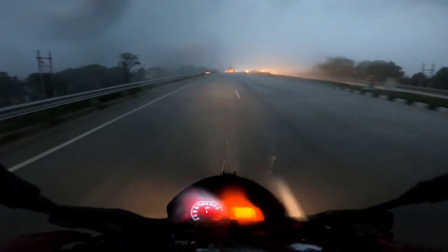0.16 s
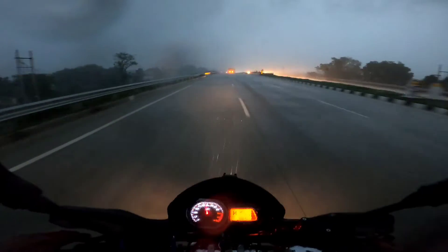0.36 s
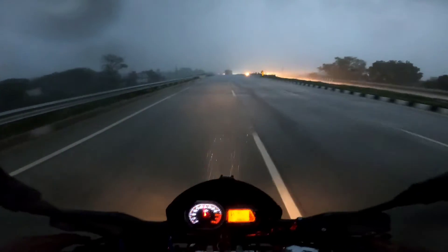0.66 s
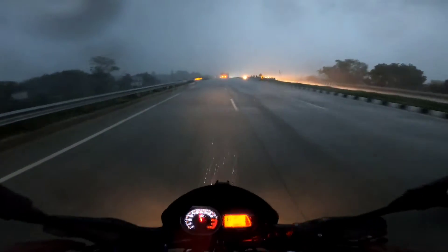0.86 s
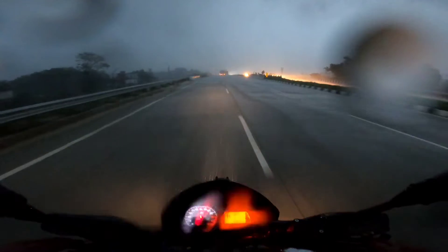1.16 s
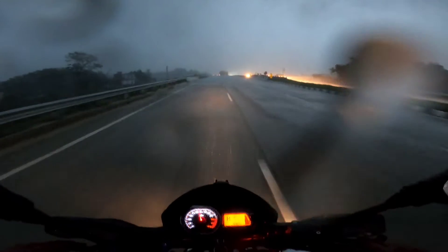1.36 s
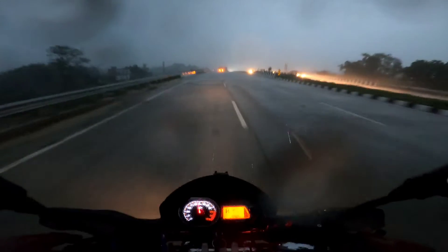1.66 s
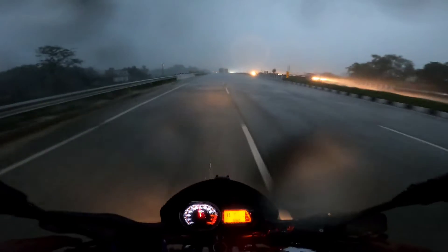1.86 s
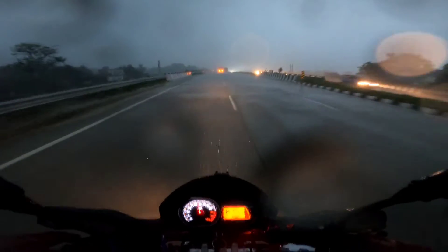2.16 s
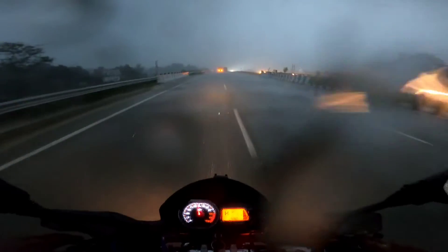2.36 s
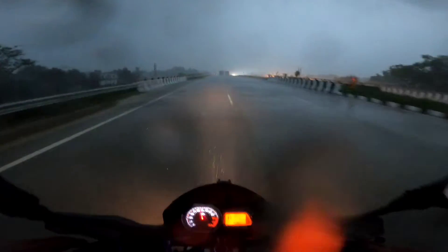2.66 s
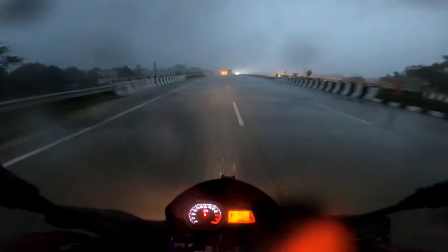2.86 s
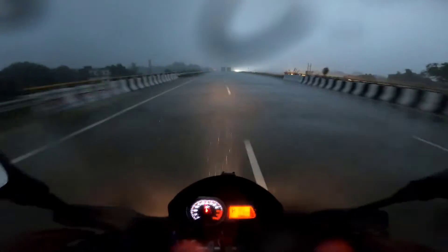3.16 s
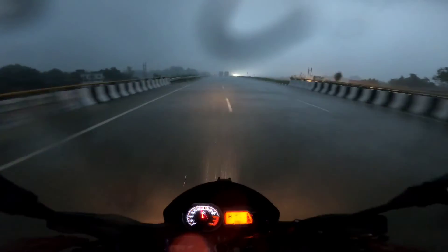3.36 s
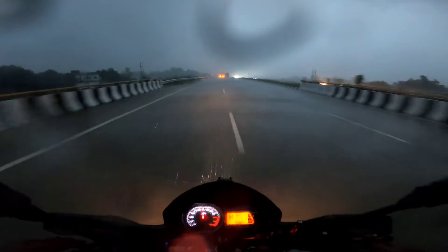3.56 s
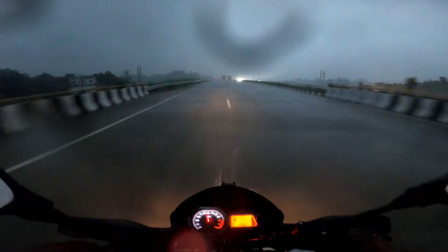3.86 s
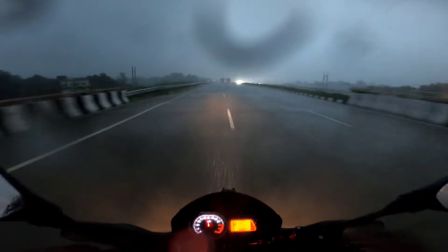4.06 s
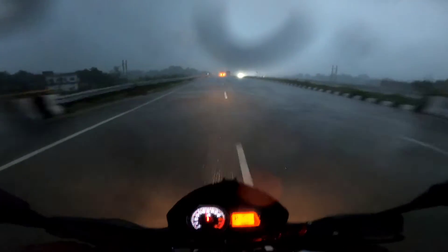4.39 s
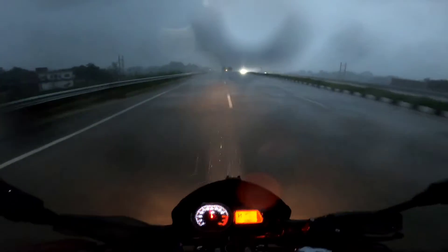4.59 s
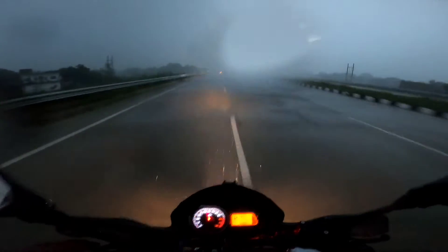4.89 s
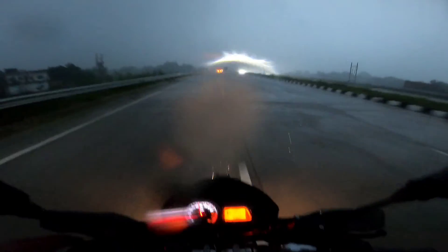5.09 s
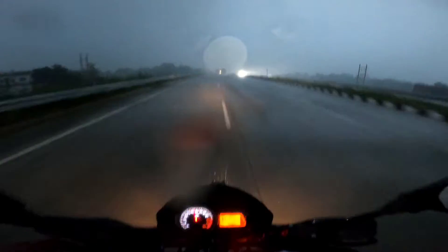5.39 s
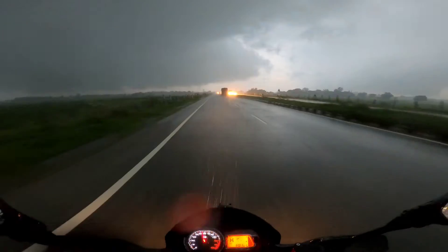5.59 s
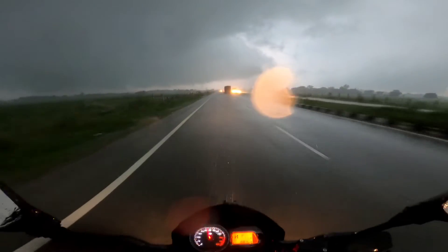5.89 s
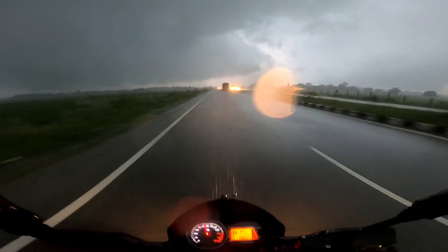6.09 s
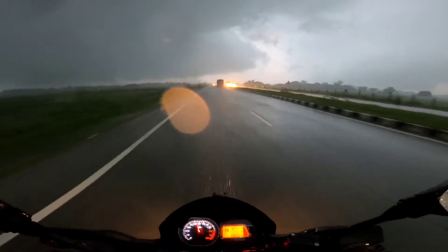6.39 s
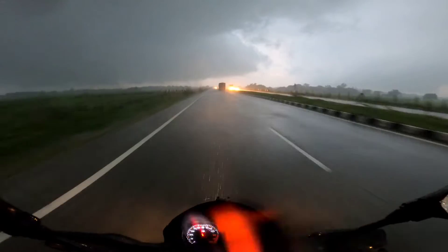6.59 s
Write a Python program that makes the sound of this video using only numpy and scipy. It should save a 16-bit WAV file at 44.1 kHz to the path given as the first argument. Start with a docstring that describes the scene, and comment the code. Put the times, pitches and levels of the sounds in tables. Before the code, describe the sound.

An exposed microphone in a plastic housing rides above a motorcycle handlebar at speed on an open road in heavy rain. Throughout, wind makes a bassy, uneven roar: slow pressure thumps, deep rumble, a hollow mid-low tone and a fluttering rush, dipping and swelling several times a second. From 0 to 1.8 s, dry, sharp raindrop ticks crowd together with spray hiss, short watery slaps and very faint high noise flecks. From 1.9 to 3.9 s drops are sparser and wind dominates, heavy near 2.9 s, with a slap near 3.4 s. Hard snaps strike at about 4.0 and 4.1 s, then a wet splat at 4.9 s and another hard tick just after. At 5.65 s sound cuts abruptly to silence, fading back by 5.95 s. Wind and a fresh cluster of ticks continue to the end, around 6.7 s. No engine is heard.

```python
"""Wind buffets and roars round a plastic housing above the handlebar of a motorcycle ridden fast in heavy rain.
Wind is four bands of noise: slow pressure lumps, a deep roar, a hollow roar and an edge rush; no engine is heard.
Spray is hiss and tiny bursts; drops tick and ring the shell by damped sines; slaps and gobs are shaped noise.
Faint narrow-band noise bursts come early on.
Near 5.65 s the sound drops out for about a quarter of a second, then fades back in.
"""
import sys
import numpy as np
from scipy import signal
from scipy.fft import rfft, irfft, next_fast_len
from scipy.io import wavfile
from scipy.ndimage import uniform_filter1d, map_coordinates

SR = 44100
rng = np.random.default_rng(int(sys.argv[2]) if len(sys.argv) > 2 else 0)


def store_wav(level_fs):
    """Save 16-bit WAV to argv[1]."""
    pcm = np.round(np.clip(np.atleast_2d(level_fs), -1, 1) * 32767)
    wavfile.write(sys.argv[1], SR, pcm.T.astype(np.int16))


N = 297218


def amp(db):
    """Decibels to gain."""
    return 10 ** (np.asarray(db) / 20)


def unit(x):
    """Scale to rms 1."""
    return x / np.sqrt(np.mean(x ** 2) + 1e-20)


def unit_peak(rows):
    """Scale each row to a peak of 1."""
    return rows / (np.abs(rows).max(axis=-1, keepdims=True) + 1e-20)


def columns(rows):
    """Table columns, each shaped to broadcast along time."""
    return np.transpose(rows)[:, :, None]


def curves(rows):
    """One interpolated value per sample for each column after the time."""
    time_s, *cols = np.transpose(rows)
    return [np.interp(np.arange(N) / SR, time_s, col) for col in cols]


def bell(centre_s, half_s):
    """Gaussian bell of peak 1, down to 1/e at half_s from its centre."""
    return np.exp(-((np.arange(N) / SR - centre_s) / half_s) ** 2)


def swells(rows):
    """Sum of bell-shaped level changes in dB."""
    time_s, change_db, half_s = columns(rows)
    return (change_db * bell(time_s, half_s)).sum(0)


def wobble(rate_hz):
    """Smooth random curve with rate_hz knots a second."""
    knots = rng.standard_normal(int(N * rate_hz / SR) + 4)
    return map_coordinates(knots, [np.arange(N) * rate_hz / SR])


def coloured(x, spectrum):
    """Filter x by a gain curve interpolated in dB over log frequency."""
    n = x.shape[-1]
    m = next_fast_len(n + n // 8)
    hz, db = np.transpose(spectrum)
    gain = amp(np.interp(np.log(np.fft.rfftfreq(m, 1 / SR) + 1), np.log(hz), db))
    return irfft(rfft(x, m) * gain, m)[..., :n]


def placed(sounds, starts_s):
    """Sum the rows of sounds, each from its start time."""
    index = np.round(np.abs(starts_s) * SR).astype(int) + np.arange(sounds.shape[1])
    return np.bincount(index.ravel(), sounds.ravel(), N)[:N]


# brief, faint narrow-band noise bursts: (time [s], level [dB], centre [Hz], half length [s])
NOISE_BURSTS = [(.585, -55, 4550, .004), (0.711, -59, 5870, 0.014), (0.786, -51, 4500, .005),
                (0.996, -55, 5500, 0.011), (1.174, -59, 4200, .02), (1.225, -66, 3930, .015)]


def noise_bursts(width_hz):
    """Brief, faint narrow-band noise bursts: a random complex envelope on a carrier, with fast level wobble."""
    t = np.arange(N) / SR
    out = np.zeros(N)
    for time_s, level_db, hz, half_s in NOISE_BURSTS:
        envelope = wobble(width_hz) + 1j * wobble(width_hz)
        band = np.real(envelope * np.exp(2j * np.pi * hz * t))
        noise = unit(band * amp(3 * wobble(200)))
        out += amp(level_db) * bell(time_s, half_s) * noise
    return out


# colour of water thrown flat on the shell: (frequency [Hz], gain [dB])
SLAP_SPECTRUM = [(600, -29.5), (950, 4.5), (1200, 4), (1500, -1), (1900, -10), (2400, -17.5), (3200, -29.5),
                 (5000, -43.5), (9000, -78.5)]
# slaps of water: (time [s], level [dB], half length [s])
WATER_SLAPS = [(.195, -38.5, 0.031), (.368, -33.5, 0.016), (0.613, -39, 0.013), (.675, -36, 0.044),
               (0.79, -36, 0.027), (1.01, -39, .015), (1.235, -35, 0.013), (1.43, -40, 0.019),
               (1.642, -40, 0.024), (3.323, -40, 0.031), (3.395, -31.5, 0.0055), (3.68, -49, 0.026),
               (4.08, -33, 0.0069), (4.406, -37, 0.015), (4.785, -46, 0.016), (6.135, -43, .009),
               (6.21, -39, .015)]


def slaps(eddies):
    """Water thrown flat on the shell: short, low, churning rushes of noise."""
    time_s, level_db, half_s = columns(WATER_SLAPS)
    level = (amp(level_db) * bell(time_s, half_s)).sum(0)
    churn = coloured(rng.standard_normal(N), SLAP_SPECTRUM) * amp(4.4 * eddies)
    return level * unit(churn)


# modes of the housing: (frequency [Hz], relative level [dB], share of the ring time [ratio])
SHELL_MODES = [(2170, -10, 0.7), (2660, -6, 0.95), (2940, -18, 0.6), (3200, -10, 0.55), (3850, -14, 0.55)]


def shell_ring(t, ring_t60_s, mode_gains):
    """Decaying sines at the shell modes, with one row of mode gains per hit."""
    ring = 0
    for k, (mode_hz, level_db, share) in enumerate(SHELL_MODES):
        decay = amp(level_db - 60 * t / (share * ring_t60_s))
        ring = ring + mode_gains[:, [k]] * decay * np.sin(2 * np.pi * mode_hz * t)
    return ring


# colour of a gob on the wet shell: (frequency [Hz], gain [dB])
SMEAR_SPECTRUM = [(1500, -26), (2150, -5), (2420, -6), (2750, 4.5), (3100, -1), (3400, -15), (3700, -15.5),
                  (3900, -5), (4400, -14), (4850, -36.5), (6300, -27.5), (7500, -38.5), (12000, -51.5)]
# gobs of water: (time [s], level [dB], smear T60 [s], shell ring before colouring, relative to level [dB])
GOBS = [(4.015, -39.5, 0.17, 1.5), (4.876, -27.5, 0.055, 10)]
GOB_RISE_S = 0.0097  # faint noise swells just before each gob's hit
GOB_RING_T60_S = 0.028  # its weight sets the shell ringing for longer than a drop does


def splats():
    """A gob rings the shell, scours it in spurts and drains away; the water film colours both sounds."""
    time_s, level_db, t60_s, ring_db = columns(GOBS)
    t = np.arange(N) / SR - time_s
    after = np.maximum(t, 0)
    scour = unit(coloured(rng.standard_normal(N), SMEAR_SPECTRUM) * amp(2.1 * wobble(270)))
    envelope = amp(-60 * after / t60_s) * np.exp(np.minimum(t, 0) / GOB_RISE_S)
    ring = shell_ring(after, GOB_RING_T60_S, np.ones((1, len(SHELL_MODES))))
    gobs = envelope * scour + amp(ring_db) * coloured(ring, SMEAR_SPECTRUM)
    return (amp(level_db) * gobs).sum(0)


# airflow and water before gusts and trims:
# (time [s], deep roar level [dB], hollow roar level [dB], edge rush level [dB], spray level [dB])
FLOW_LEVELS = [(0.0, -26, -21.5, -38, -61.5), (0.18, -23, -25, -31, -53.0), (0.38, -18, -21.22, -31, -52.5),
               (0.65, -26.5, -26.5, -29, -46.5), (0.82, -21, -22, -28.65, -47.5),
               (1.15, -19.5, -20, -32, -54), (1.5, -19, -21.51, -30.5, -50.5), (1.95, -19.5, -19, -31, -60),
               (2.45, -18, -19.5, -30.65, -57.5), (2.85, -14.5, -16.5, -33, -54),
               (3.35, -21.5, -27.5, -29, -55.0), (3.65, -20, -19, -29.5, -57.5),
               (4.05, -17, -23, -27.5, -51.5), (4.28, -18.5, -22, -31.5, -52),
               (4.82, -22.5, -28.5, -26, -50.5), (5.05, -20, -23, -38.69, -58.0),
               (5.5, -17, -18.14, -30, -53.5), (5.97, -19.5, -23.5, -35, -52.0),
               (6.12, -18, -27, -35, -49.0), (6.4, -18.5, -20, -32.5, -56.0),
               (6.73, -16.5, -22, -35.5, -53.0)]
# gusts and lulls, as the stream swings onto the microphone or off it:
# (time [s], change before share [dB], half length [s])
GUSTS_AND_LULLS = [(0.04, 6, 0.07), (0.26, -4.5, 0.015), (0.46, 4.5, 0.017), (0.51, -12.5, 0.02),
                   (0.68, 0.5, 0.057), (0.99, -7, 0.017), (1.11, -5, 0.024), (1.34, -1.3, 0.035),
                   (1.49, -6, 0.047), (1.6, -3.4, 0.03), (1.89, 0.7, 0.06), (1.95, -5.5, 0.019),
                   (2.65, -5.5, 0.063), (2.71, -0.5, 0.024), (2.82, -4.5, 0.075), (3.03, -9.4, 0.034),
                   (3.23, 3, 0.035), (3.3, -6, 0.016), (3.55, 3, 0.057), (3.86, -2, 0.051),
                   (4.04, 5.5, 0.016), (4.05, -7.5, 0.052), (4.38, -6.5, 0.02), (4.52, -5.0, 0.014),
                   (4.68, 3, 0.015), (4.73, -3, 0.02), (4.9, 4.5, 0.037), (5.02, 5.5, 0.035),
                   (5.16, 3.5, 0.017), (5.21, -3, 0.02), (5.39, -1, 0.035), (5.51, -3, 0.032),
                   (6.64, -11.5, 0.015), (6.71, -1, 0.055)]
# share of that change reaching each layer:
# (buffet [ratio], deep roar [ratio], hollow roar [ratio], edge rush [ratio], spray [ratio])
LAYER_GUST_SHARE = [0.22, 1, 1, 0.22, 0.58]
BUFFET_BASE_DB = -19.5  # steady speed, steady pressure on the port; gusts add to it


def flow():
    """Levels in dB of buffet, deep roar, hollow roar, edge rush and spray, raised by gusts and cut by lulls."""
    base_db = np.array([np.full(N, BUFFET_BASE_DB), *curves(FLOW_LEVELS)])
    return base_db + np.outer(LAYER_GUST_SHARE, swells(GUSTS_AND_LULLS))


def droplets(count, pitch_hz, pitch_spread, cycles, size_spread_db):
    """Splatter of tiny bursts, a few cycles each, at random times, pitches and sizes."""
    t = np.arange(SR // 120) / SR
    start, pitch, rarity = rng.random((count, 3)).T[:, :, None]
    hz = np.minimum(pitch_hz * np.exp(pitch_spread * (2 * pitch - 1)), SR / 3)
    age = t * hz / cycles
    size = amp(-size_spread_db * np.log(np.maximum(rarity, 1 / 10)))  # few are large
    grains = size * age * np.exp(-3 * age) * np.sin(2 * np.pi * hz * t)
    return placed(grains, start * N / SR)


# colour of fine water: (frequency [Hz], gain [dB])
MIST_SPECTRUM = [(500, -21), (1000, -1), (1500, -3.5), (2100, -6.5), (2420, -12.5), (2680, -13),
                 (3100, -18), (3800, -21), (4700, -32.5), (6500, -31), (7800, -47), (11000, -59.5),
                 (15000, -87)]
# sheets of spray sweeping over the housing, negative for gaps: (time [s], change [dB], half length [s])
SPRAY_SHEETS = [(.365, 3, 0.07), (.49, -10, .028), (.94, -14, .03), (1.04, 3.5, 0.061), (1.21, -0.5, 0.039),
                (1.42, 1, 0.038), (1.95, -8, 0.028), (3.39, 2, 0.024), (4.41, 4, 0.023), (4.58, 5, 0.041),
                (5.08, -5, 0.027), (6.12, 3.5, 0.045), (6.64, -1.5, .025)]


def spray(eddies, hiss_db, splatter_db):
    """Fine water rides on the eddies and sweeps by in sheets: hiss plus coarse splatter."""
    spray_db = flow()[-1] + swells(SPRAY_SHEETS)
    hiss = unit(coloured(rng.standard_normal(N), MIST_SPECTRUM) * amp(4.5 * eddies))
    grains = droplets(count=3500, pitch_hz=2700, pitch_spread=0.79, cycles=3.1, size_spread_db=6.5)
    pressure = np.gradient(grains)  # pressure follows the rate of change
    splatter = unit(coloured(pressure, MIST_SPECTRUM) * amp(2.4 * eddies))
    return amp(spray_db) * (amp(hiss_db) * hiss + amp(splatter_db) * splatter)


SMALL_DROP_HZ, SMALL_DROP_LOG_SPREAD = 2900, 0.4


def small_drops(count, above_spray_db, spread_db, splash_db, push_db):
    """Further drops land at random, more often and harder in thick spray; columns as in TIMED_DROPS."""
    spray_db = curves(FLOW_LEVELS)[-1]
    landed = np.cumsum(amp(0.62 * spray_db))
    quantile = (np.arange(count) + rng.random(count)) / count
    at = np.searchsorted(landed / landed[-1], quantile)
    size, spot, wetness, rim = rng.uniform(-0.88, 1, (4, count))
    level_db = (spray_db[at] + spray_db.mean()) / 2 + above_spray_db + spread_db * size
    pitch_hz = SMALL_DROP_HZ * np.exp(SMALL_DROP_LOG_SPREAD * spot)
    wet_splash_db = splash_db + 6 * wetness - 3 * size
    rebound_s = 0.0012 * np.exp(0.39 * rim)
    return np.column_stack([at / SR, level_db, pitch_hz, wet_splash_db, np.full(count, push_db), rebound_s])


# individually timed drops on the housing: (time [s], peak level of spot and ring [dB], spot pitch [Hz], #
# splash re that peak [dB], dull push re that peak [dB], delay of the rebound from the rim [s])
TIMED_DROPS = [(0.0661, -40, 2200.0, -9.5, -8, 0.00093), (0.0887, -25.5, 3100.0, -34, -8, 0.00049),
               (0.1945, -37, 2950.0, -13, -21, 0.00055), (0.21, -37, 2350.0, -28, -1.5, 0.00045),
               (0.281, -42, 3100.0, -9, -20.0, 0.00105), (0.2926, -31, 2950.0, -16.0, -5, 0.00135),
               (0.2988, -31, 2500.0, -0.5, -20.0, 0.001), (0.3169, -28, 3420, -7.5, -7, 0.00065),
               (0.352, -25, 3550.0, -24, -19, 0.00105), (0.363, -20.5, 2480, -27, -5.0, 0.00099),
               (0.4243, -37, 2350.0, -12, -10.0, 0.00055), (0.4338, -39.0, 2500.0, -30.0, 1, 0.00045),
               (0.4492, -28, 3080, -31, -20.0, 0.00059), (0.4977, -34, 2500.0, -7, -8, 0.00055),
               (0.5447, -42, 3700.0, -9, -1, 0.00048), (0.556, -39.0, 3100.0, -12, 3.0, 0.00135),
               (0.5693, -35.5, 2200.0, -29, -8, 0.00045), (0.5831, -31, 2200.0, -30.0, -20.0, 0.00045),
               (0.6081, -26.5, 2500.0, -7.5, -3, 0.00043), (0.6146, -35.0, 2200.0, -18, -20.0, 0.00051),
               (0.6388, -28.5, 3250.0, -18, -20.0, 0.00048), (0.666, -31, 2200.0, -31, -5.0, 0.0005),
               (0.6779, -31, 2200.0, -30.0, 1, 0.00135), (0.6912, -24.5, 2350.0, -15, -8, 0.00105),
               (0.7049, -33.5, 2200.0, -8.5, -10.0, 0.00085), (0.7152, -19.5, 2950.0, -16.5, -6, 0.00065),
               (0.743, -26.5, 2500.0, -29, -10.0, 0.00071), (0.763, -36.5, 2350.0, -29.5, -22.5, 0.00085),
               (0.7771, -31, 2200.0, -32.5, -20.0, 0.00055), (0.7884, -24, 2200.0, -29, -18, 0.0012),
               (0.8086, -35, 2500.0, -31, -2, 0.00085), (0.8224, -50, 3400.0, -28, 2, 0.00135),
               (0.8356, -39, 3530, -13, -9, 0.00095), (0.8395, -29.5, 3400.0, -11.5, -18, 0.00105),
               (0.8587, -40, 2800.0, -10, -17, 0.00105), (0.8808, -32, 2950.0, -18, -3, 0.00135),
               (0.9612, -33, 2200.0, -31, 1, 0.0005), (0.9957, -28, 3100.0, -3, -17, 0.00099),
               (1.0144, -29, 2200.0, -28, -19.5, 0.00045), (1.0249, -34, 2950.0, -30.0, -18, 0.00095),
               (1.0527, -29.5, 3900, -9, 3.5, 0.00095), (1.0679, -41, 3850.0, -13, -7, 0.00045),
               (1.1727, -30, 2950.0, -14, 2, 0.00092), (1.1904, -31, 2650.0, -17.5, -20.0, 0.00069),
               (1.2398, -38, 3120, -16.0, -7, 0.00135), (1.2452, -33.5, 3100.0, -15, -9, 0.00135),
               (1.3773, -30, 2650.0, -18, -4, 0.00055), (1.3961, -40.5, 2350.0, -32, -10.0, 0.00075),
               (1.4113, -28.5, 2950.0, -13, -5.0, 0.00055), (1.4328, -29.5, 3100.0, -20, -21, 0.00105),
               (1.4471, -35.5, 3550.0, -13, -20.0, 0.00105), (1.4839, -36, 2200.0, -30.0, -5.0, 0.00105),
               (1.54, -40, 2500.0, -24, -6, 0.00075), (1.5503, -27.5, 2200.0, -13.5, -12.5, 0.00048),
               (1.605, -29.5, 2200.0, -21, -7, 0.0006), (1.6355, -17.5, 2850, -21, -15, 0.00067),
               (1.6995, -37, 2670, -11, -11, 0.00135), (1.739, -34.5, 2200.0, -19, -20.0, 0.00049),
               (1.7644, -36.5, 2950.0, -28, 0, 0.00068), (1.7836, -36, 3100.0, -10, -20.0, 0.00075),
               (1.9098, -31, 2230, -29, -20.0, 0.00059), (2.3153, -31, 2370, -29, -3, 0.00053),
               (2.4706, -32, 2520, -22.0, -21, 0.00135), (2.5068, -24.5, 2500.0, -23, -19, 0.00095),
               (2.6176, -39, 3100.0, -9.5, -6, 0.00045), (2.647, -36, 3100.0, -2.5, -17, 0.00062),
               (2.6725, -38.5, 2500.0, -29, -7, 0.00042), (2.7226, -29.5, 3960, -14, 8.5, 0.00093),
               (2.7551, -30.5, 2930, -17, -10.0, 0.00051), (2.8135, -25.0, 2900, -24, -9.5, 0.00055),
               (2.8464, -30.5, 2220, -35, -22, 0.00045), (2.8862, -40, 2200.0, -32, -22, 0.00085),
               (3.0102, -30, 2920, -18, -23, 0.00135), (3.0761, -33, 3040, -18, -4, 0.00052),
               (3.121, -32.5, 2350.0, -22.0, -24, 0.0015), (3.1763, -27.5, 2200.0, -20, -15, 0.00065),
               (3.1932, -28, 2800.0, -20, -18, 0.00053), (3.3909, -35.5, 2900, -30.0, 6.5, 0.00135),
               (3.5876, -40, 3350, -8, -2, 0.00105), (3.791, -37, 3100.0, -18, -20.0, 0.00053),
               (3.917, -25.5, 2350.0, -21, -20.0, 0.00055), (3.9237, -25.5, 2200.0, -28, -25, 0.0007),
               (3.9615, -23.5, 2220, -10.5, -23, 0.00135), (4.0048, -28, 2350.0, -30.0, -3, 0.00045),
               (4.0152, -16.0, 3100.0, -26, -21, 0.00054), (4.0265, -26, 2500.0, -30.0, -3.5, 0.00053),
               (4.1003, -27, 2210, -25, -10.0, 0.0006), (4.1238, -11.5, 2370, -30.0, -15.5, 0.00059),
               (4.1921, -27.5, 3400.0, -14, -26, 0.00135), (4.283, -36, 2800.0, -17, -24, 0.00095),
               (4.2873, -39, 2800.0, -16.0, -20.0, 0.00065), (4.3964, -29.5, 2200.0, -14, -5.0, 0.00095),
               (4.4134, -36, 2200.0, -22.0, 5, 0.0009), (4.4243, -31.5, 2950.0, -19, -5.0, 0.00055),
               (4.4666, -38, 2800.0, -18, -14.5, 0.0005), (4.4711, -31.5, 2800.0, -19, -13, 0.00055),
               (4.5077, -27, 3140, -16.0, -22, 0.00077), (4.54, -34.0, 2200.0, -33, -22, 0.00056),
               (4.6057, -30, 2350.0, -30.0, -20.0, 0.00051), (4.6237, -39.5, 2350.0, -27.5, -21, 0.00085),
               (4.6813, -31, 2210, -15.5, -21, 0.00072), (4.7108, -33.5, 3480, -11.5, -19.5, 0.00085),
               (4.7266, -36, 2500.0, -25.5, 2, 0.00055), (4.7556, -23, 2200.0, -7.5, -9, 0.00056),
               (4.769, -33.5, 2200.0, -28.5, -20.0, 0.00048), (4.8748, -13, 2680, -8, -22, 0.00079),
               (4.963, -17.5, 2650.0, -19, -5.0, 0.00105), (4.9773, -31, 2200.0, -33, -20.0, 0.00045),
               (4.9933, -28, 2200.0, -15, -20.0, 0.00049), (5.0314, -23.0, 2650.0, -20.5, -24, 0.00052),
               (5.1103, -30.0, 2200.0, -15.5, -11, 0.00043), (5.1254, -33.5, 2950.0, -12, -21.5, 0.0011),
               (5.1546, -38, 3520, -9.5, -20.0, 0.00065), (5.2181, -36, 2200.0, -13, -18.5, 0.0008),
               (5.2497, -34.5, 2500.0, -10.5, 1, 0.00053), (5.3629, -40.5, 2800.0, -35, -23, 0.00095),
               (5.438, -23.5, 2200.0, -8, -24, 0.00057), (5.458, -35, 2950.0, -23, -24, 0.00055),
               (5.5097, -29, 2200.0, -10.5, -2, 0.00099), (5.5376, -37.0, 3350, -13, -4, 0.0008),
               (5.9625, -32, 2500.0, -22.0, -18.5, 0.00085), (5.9923, -34.5, 3680, -14.5, -4, 0.00095),
               (6.003, -38.5, 2350.0, -30.0, -20.0, 0.00095), (6.0464, -38, 2350.0, -29, -8, 0.00135),
               (6.055, -38.0, 2650.0, -30.0, -7, 0.00075), (6.101, -19, 2350.0, -30.0, -7, 0.00092),
               (6.131, -22.5, 2200.0, -18, -20.0, 0.00095), (6.1371, -25, 2350.0, -6.5, -4, 0.0011),
               (6.1482, -33, 2650.0, -13, 1, 0.0012), (6.2923, -28.5, 3700.0, -9, 1, 0.00095),
               (6.308, -33.0, 2800.0, -19.5, -3, 0.00095), (6.3162, -26.5, 3120, -22.0, -8, 0.00046),
               (6.3598, -33.0, 3100.0, -16.0, -10.0, 0.00048), (6.3765, -24.5, 2330, -14.5, -4, 0.00046),
               (6.4059, -38.5, 2350.0, -16.0, -20.0, 0.00055), (6.422, -33.5, 3100.0, -6.5, -18, 0.0009),
               (6.4766, -33.5, 2350.0, -30.0, -5.0, 0.00053), (6.5659, -25, 2350.0, -27, -18, 0.00047),
               (6.617, -36.5, 2950.0, -21, 3, 0.00135), (6.6784, -32.5, 2350.0, -15, -19, 0.0012)]
# colour of the bright splash: (frequency [Hz], gain [dB])
SPLASH_SPECTRUM = [(1000, -25), (2500, -8), (4000, -4), (4750, -9), (5450, 0), (6900, -11.5), (8000, -23.5),
                   (9000, -23), (12000, -33), (15000, -54)]
DROP_RING_T60_S = 0.011  # scaled by each mode's share; the wet shell hardly rings
MODE_SPREAD_DB = 2  # from one spot on the shell to another
PUSH_HZ, PUSH_S = 1630, 0.0007
FLATTEN_S = 0.00034  # a soft drop takes a moment to flatten


def strikes(drops, thud_t60_s, splash_t60_s, shell_db, rebound_share):
    """A drop's mass pushes dully, its spot sounds a few cycles, the shell rings, and water splashes brightly."""
    time_s, level_db, hz, splash_db, push_db, rebound_s = columns(drops)
    t = np.arange(SR // 25) / SR
    flatten = 1 - np.exp(-(t / FLATTEN_S) ** 2)
    spot = np.sin(2 * np.pi * hz * t) * amp(-60 * t / thud_t60_s)
    mode_offsets_db = MODE_SPREAD_DB * rng.standard_normal((len(drops), len(SHELL_MODES)))
    ring = shell_ring(t, DROP_RING_T60_S, amp(shell_db + mode_offsets_db))
    push = unit_peak(np.sin(2 * np.pi * PUSH_HZ * t) * t ** 2 * np.exp(-2 * t / PUSH_S))
    tick = unit_peak((spot + ring) * flatten) + amp(push_db) * push
    burst = rng.standard_normal(tick.shape) * amp(-60 * t / splash_t60_s) * flatten
    splash = unit_peak(coloured(burst, SPLASH_SPECTRUM))
    hits = amp(level_db) * (tick + amp(splash_db) * splash)
    # the wave back from the rim gives each spot its colour
    return placed(hits, time_s) + rebound_share * placed(hits, time_s + rebound_s)


def turbulence(spectrum, steady, window_s, patchy_db):
    """Noise of rms 1 with drifting patches of colour; its power over window_s is partly evened out."""
    z = signal.stft(rng.standard_normal(N), nperseg=1024)[2]
    field = uniform_filter1d(rng.standard_normal(z.shape), 4, 0)  # over frequency
    field = uniform_filter1d(field, 9, 1)  # over time
    patchy = signal.istft(z * amp(patchy_db * unit(field)))[1][:N]
    x = unit(coloured(patchy, spectrum))
    power = np.abs(uniform_filter1d(x ** 2, max(int(window_s * SR), 2))) + 1e-6
    return unit(x / power ** (np.clip(steady, 0, 1) / 2))


# colours of the four wind layers, each: (frequency [Hz], gain [dB])
BUFFET_SPECTRUM = [(10, -18.5), (22, -4.5), (45, 2), (68, 3.5), (120, 3), (165, -2), (240, -15),
                   (500, -77.5), (1500, -140)]
ROAR_SPECTRUM = [(70, -45.5), (140, -7.5), (195, 1.5), (260, -1), (330, -1), (380, -9), (480, -47.5),
                 (1100, -130)]
HOLLOW_SPECTRUM = [(200, -45), (320, -9.5), (380, 0), (420, -0.5), (510, 0), (590, -5.5), (720, -30),
                   (1100, -54), (3500, -140)]
EDGE_SPECTRUM = [(300, -31.5), (480, -19.5), (615, 1), (730, -5), (950, -15), (1250, -24), (1700, -40),
                 (2600, -52.5), (8000, -130)]


def wind(eddies):
    """Slow pressure lumps on the port, deep and hollow roars round the housing, and a rush off its edges."""
    buffet_db, roar_db, hollow_db, edge_db, _ = flow()
    buffet = turbulence(BUFFET_SPECTRUM, steady=1.0, window_s=0.12, patchy_db=-0.5)
    roar = turbulence(ROAR_SPECTRUM, steady=0.71, window_s=0.12, patchy_db=1.0)
    hollow = turbulence(HOLLOW_SPECTRUM, steady=0.7, window_s=0.08, patchy_db=3)
    edge = turbulence(EDGE_SPECTRUM, steady=0.9, window_s=0.071, patchy_db=1.5)
    out = amp(buffet_db) * unit(buffet * amp(0.2 * eddies))
    out += amp(roar_db - 1.18) * unit(roar * amp(1.4 * eddies))
    out += amp(hollow_db - 0.39) * unit(hollow * amp(1.3 * eddies))
    out += amp(edge_db + 1.21) * unit(edge * amp(3.6 * eddies))
    return out


def scene():
    """Wind, spray and drops at the microphone; passing eddies shake wind, spray and slaps together."""
    eddies = 0.078 * wobble(11) + 0.45 * wobble(35) + 0.62 * wobble(130)
    background = noise_bursts(width_hz=670) + slaps(eddies) + splats()
    background += spray(eddies, hiss_db=1.0, splatter_db=-1)
    fine = small_drops(count=180, above_spray_db=5.5, spread_db=6.0, splash_db=-16, push_db=-8.5)
    drops = np.vstack([TIMED_DROPS, fine])
    ticks = strikes(drops, thud_t60_s=0.0034, splash_t60_s=0.0045, shell_db=-5, rebound_share=0.49)
    return (background + ticks + wind(eddies))[None]


# dropout and return of the sound: (time [s], gain [dB])
DROPOUT_GAIN = [(5.6462, 0), (5.6463, -32), (5.67, -48), (5.69, -90), (5.875, -90), (5.893, -30),
                (5.915, -14), (5.945, -3), (5.98, 0)]
TOP_HZ = 14900


def record(dry):
    """Round off the highest peaks, apply the brief dropout, and end the band steeply at TOP_HZ."""
    gain_db, = curves(DROPOUT_GAIN)
    rounded = dry / (1 + np.abs(dry / 0.8) ** 8) ** (1 / 8)
    m = next_fast_len(N + SR // 4)
    passband = np.fft.rfftfreq(m, 1 / SR) < TOP_HZ
    return irfft(rfft(rounded * amp(gain_db), m) * passband, m)[:, :N]


dry = scene()
out = record(dry)
store_wav(out)
```